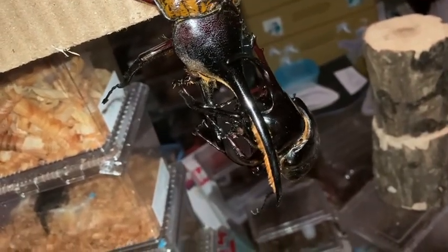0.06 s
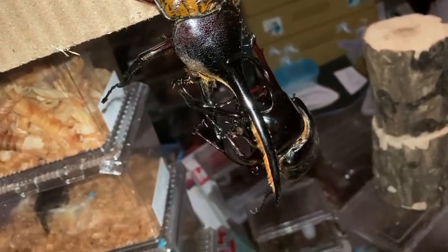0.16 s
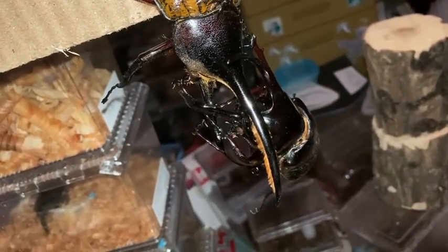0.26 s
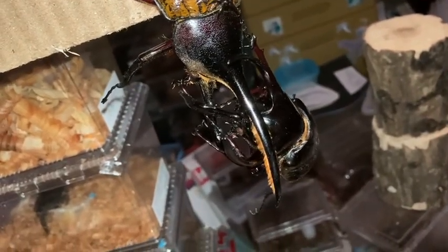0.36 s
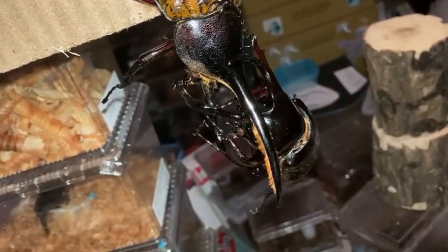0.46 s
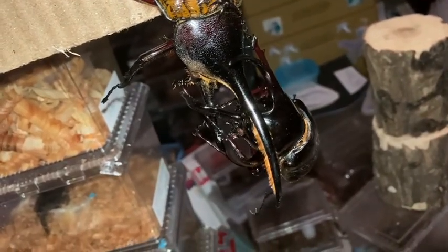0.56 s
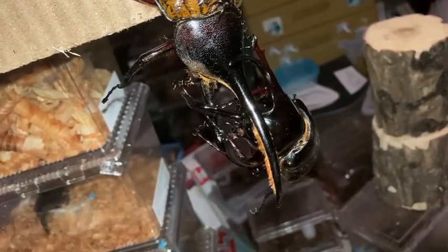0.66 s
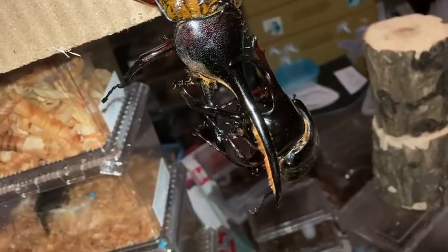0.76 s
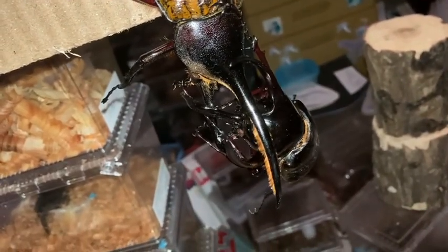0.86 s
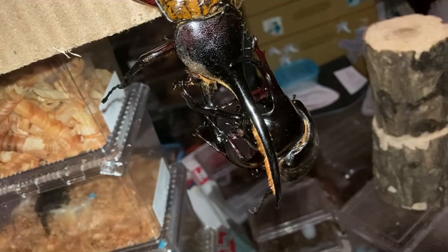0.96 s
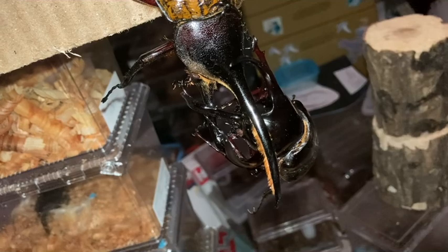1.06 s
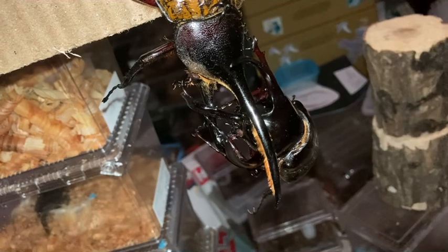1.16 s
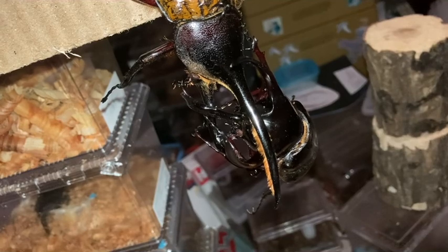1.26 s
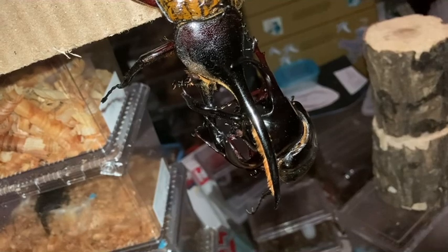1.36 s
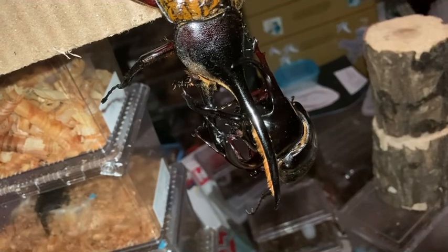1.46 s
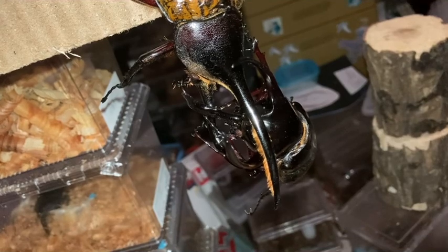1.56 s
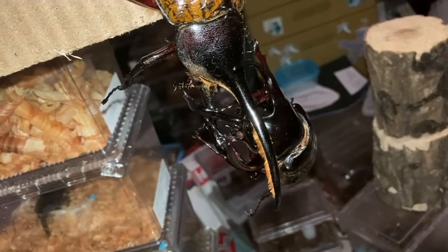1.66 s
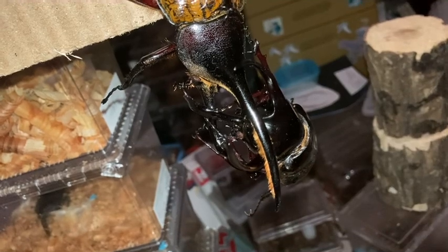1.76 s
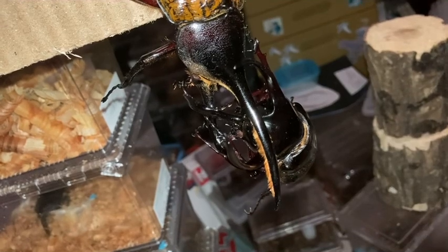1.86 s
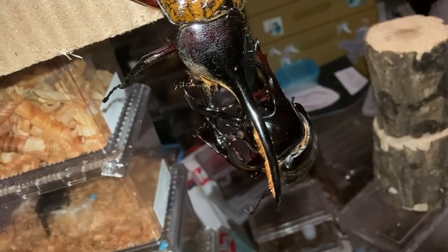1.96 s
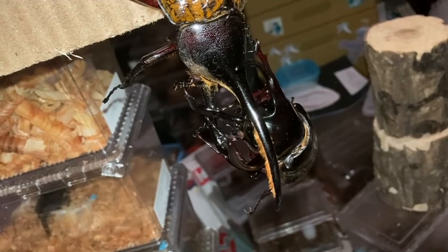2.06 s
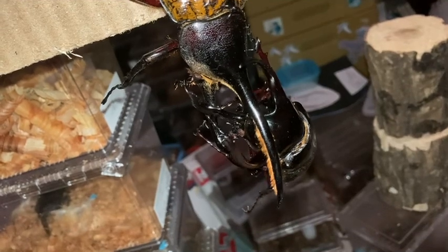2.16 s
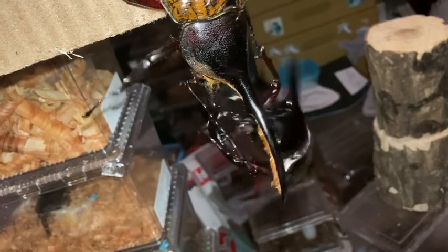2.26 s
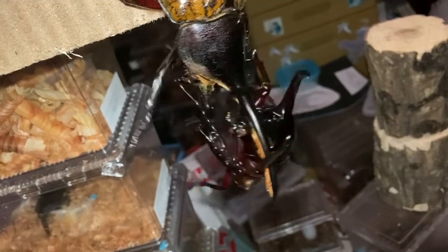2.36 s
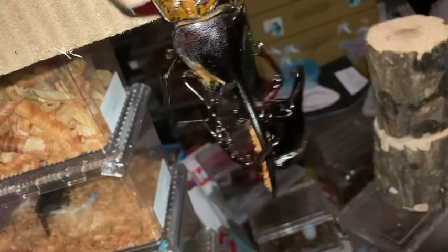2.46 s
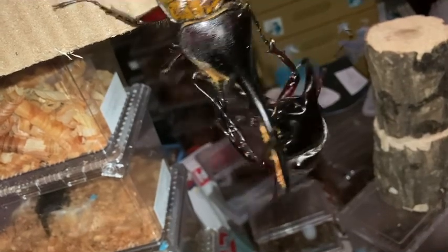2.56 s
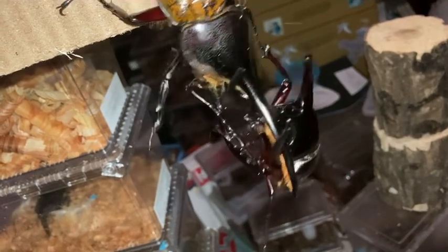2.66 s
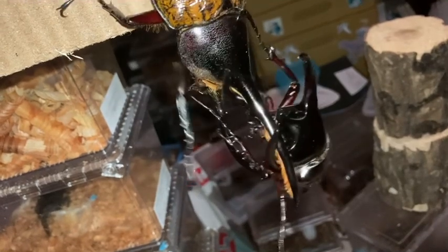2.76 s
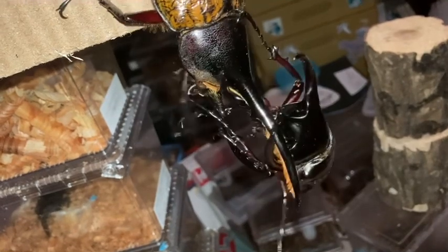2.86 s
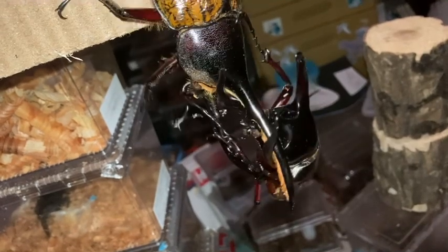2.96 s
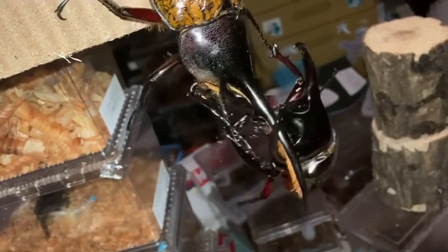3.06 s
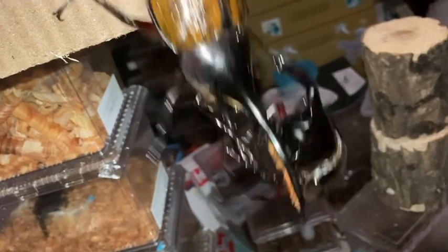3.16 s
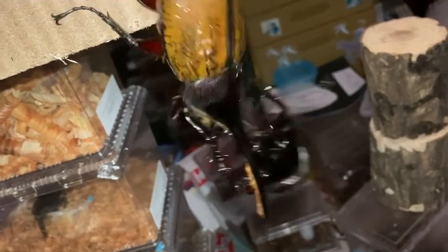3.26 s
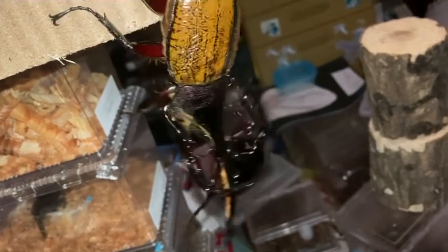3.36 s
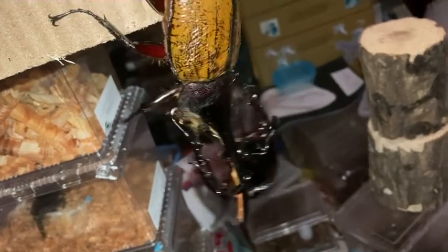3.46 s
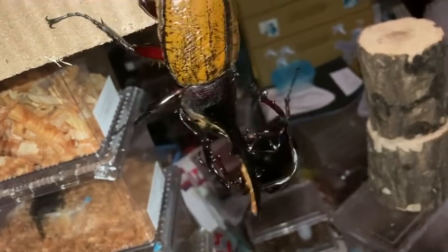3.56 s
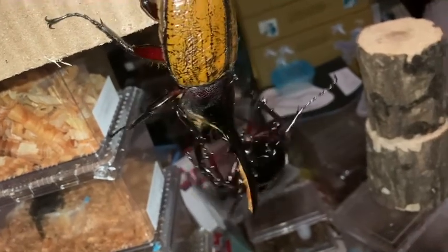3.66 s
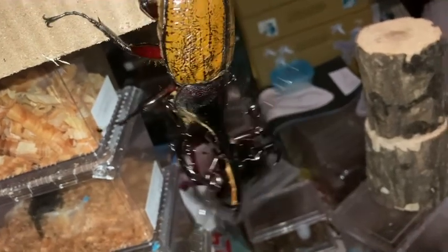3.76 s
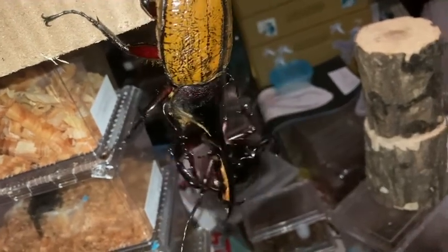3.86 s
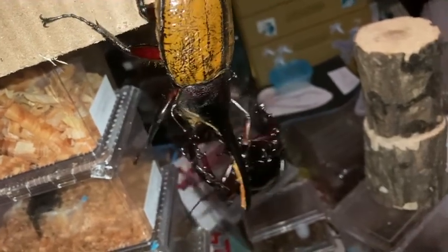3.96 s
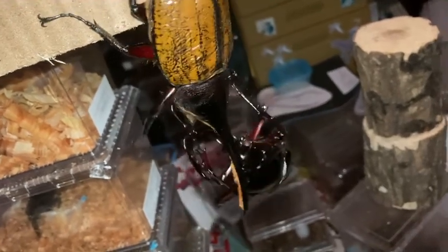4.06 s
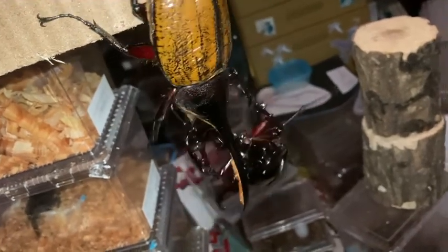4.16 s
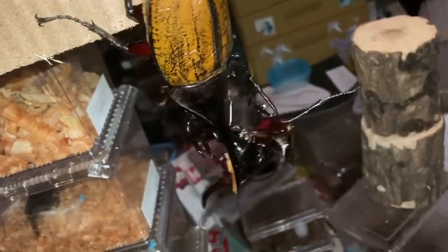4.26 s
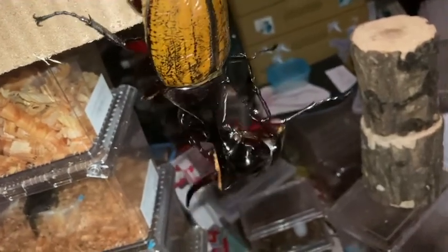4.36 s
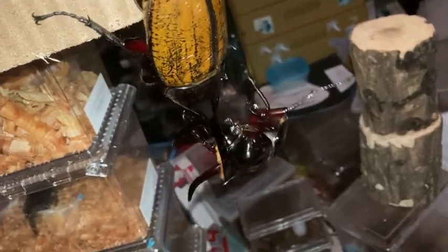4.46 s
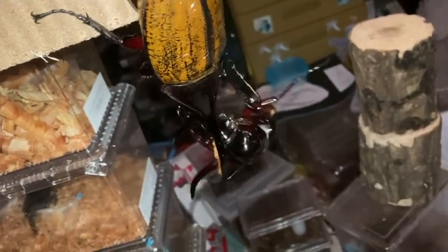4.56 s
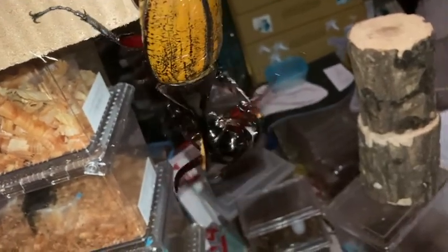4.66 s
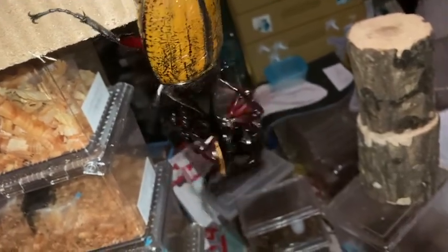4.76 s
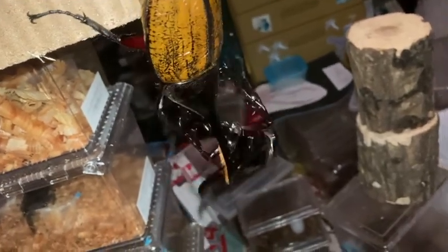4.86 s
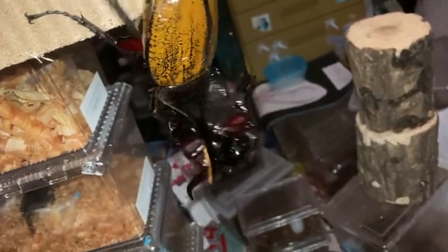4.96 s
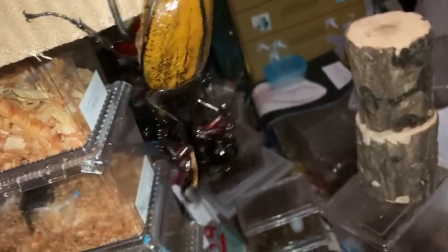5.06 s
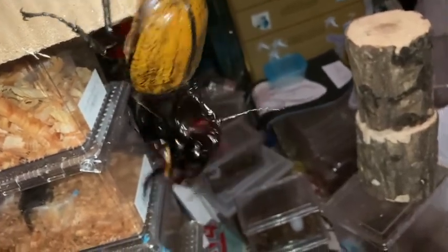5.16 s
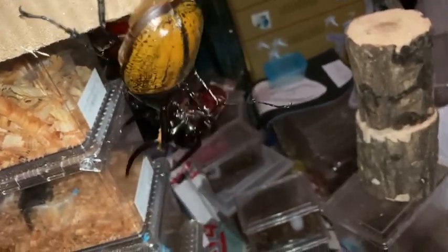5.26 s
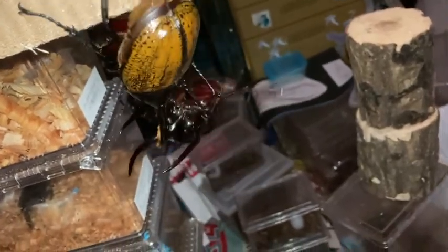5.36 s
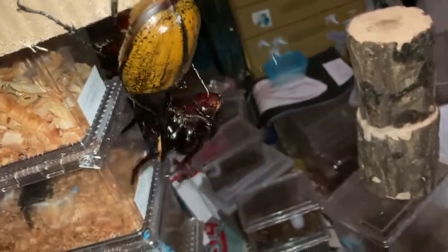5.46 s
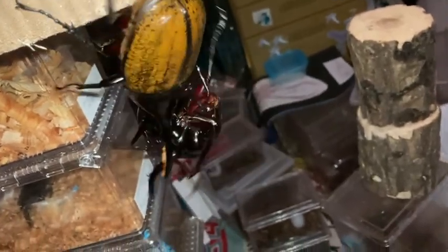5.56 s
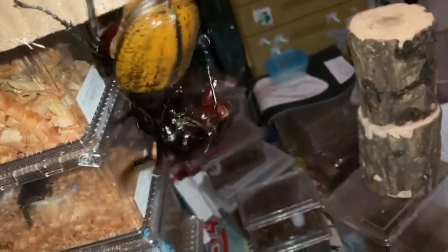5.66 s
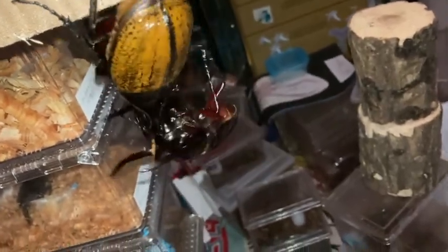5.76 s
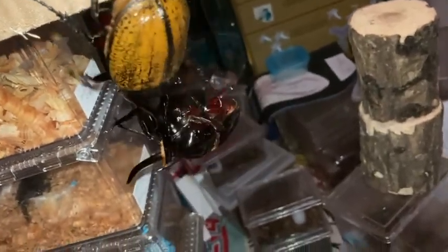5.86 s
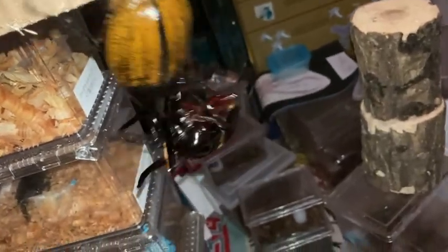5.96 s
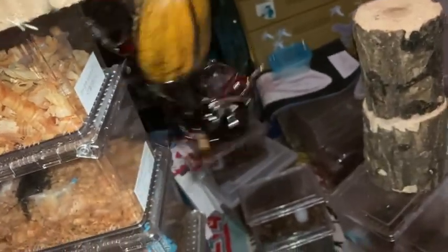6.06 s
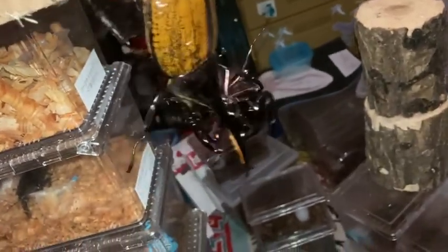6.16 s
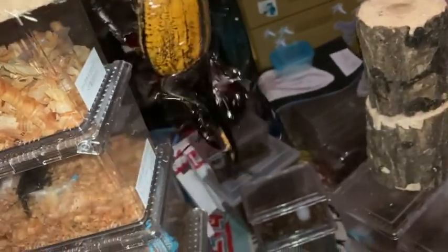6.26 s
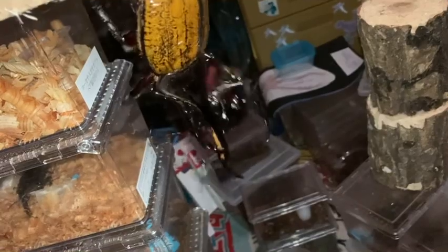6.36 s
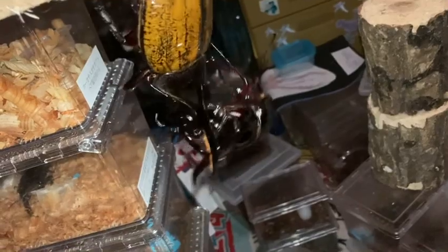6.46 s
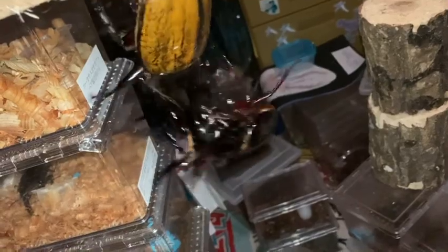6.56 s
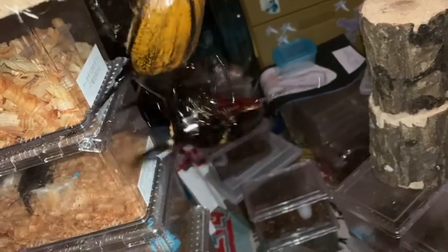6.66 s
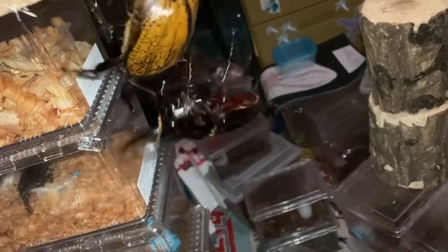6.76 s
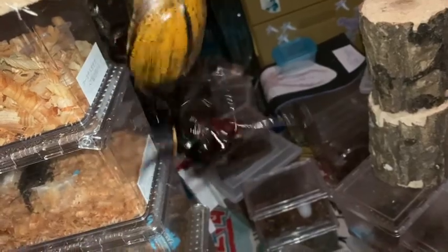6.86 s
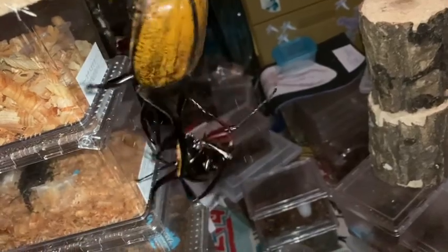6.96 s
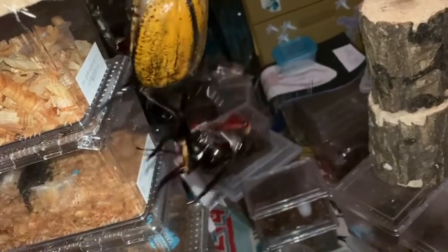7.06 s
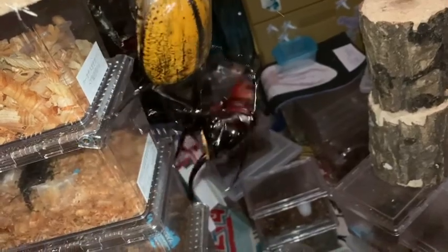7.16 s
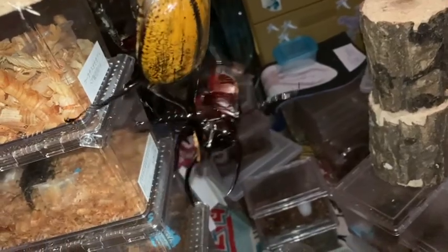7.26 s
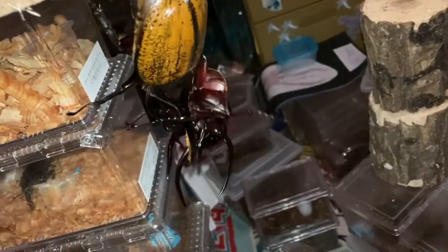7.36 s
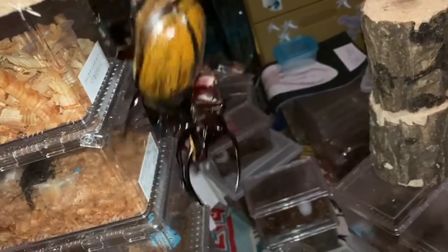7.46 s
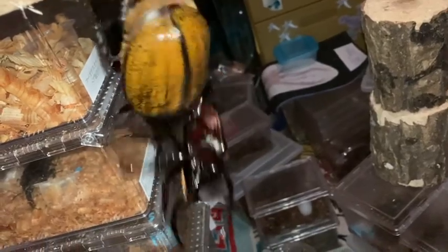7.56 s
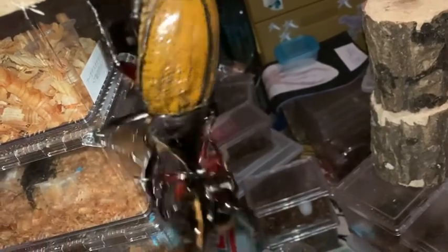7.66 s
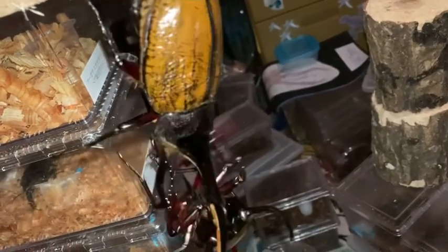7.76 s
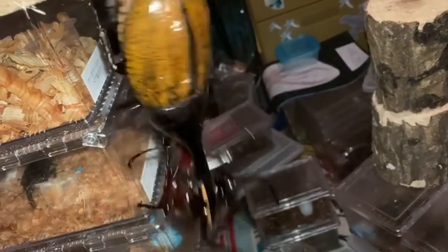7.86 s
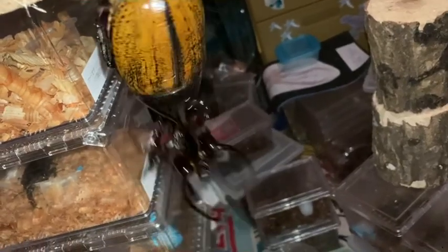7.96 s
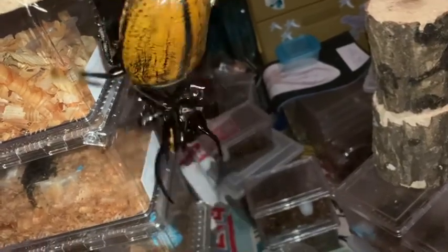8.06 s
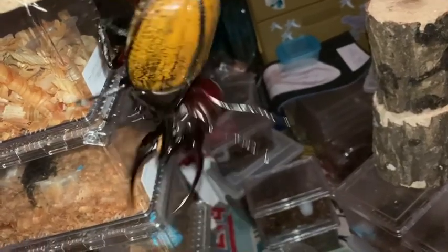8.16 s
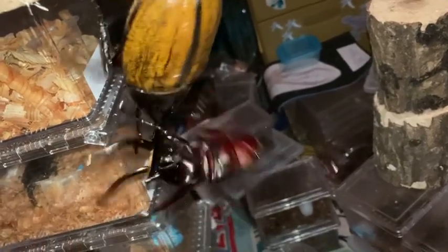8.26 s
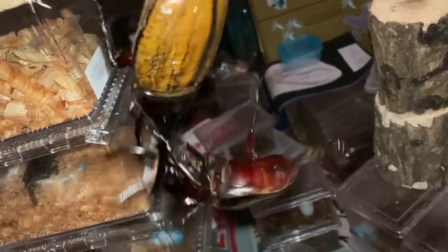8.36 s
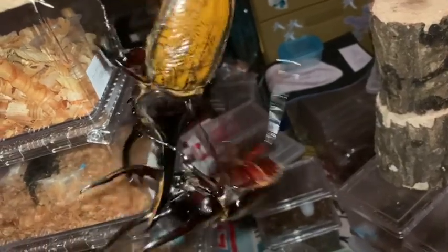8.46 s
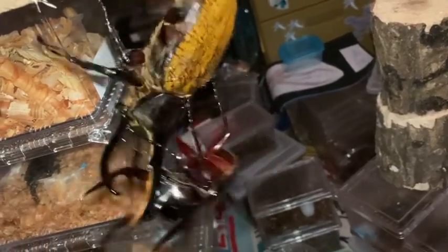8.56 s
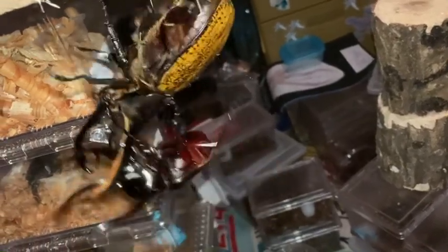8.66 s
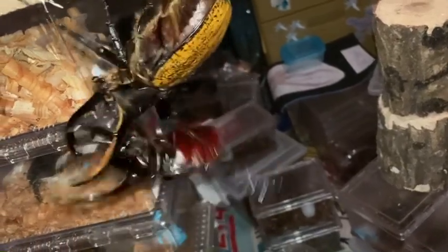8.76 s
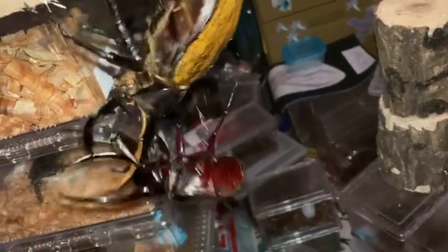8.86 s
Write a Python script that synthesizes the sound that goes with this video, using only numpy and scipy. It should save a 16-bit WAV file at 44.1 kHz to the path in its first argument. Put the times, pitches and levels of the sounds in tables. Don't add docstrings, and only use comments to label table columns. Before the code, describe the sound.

Quiet room hum with soft floor thuds, then irregular dry scratches, sharp claw clicks and hollow shell taps from two wrestling beetles close up.

```python
import sys
import numpy as np
from scipy import signal
from scipy.fft import rfft, irfft, next_fast_len
from scipy.io import wavfile
from scipy.ndimage import uniform_filter1d

SR = 44100
rng = np.random.default_rng(int(sys.argv[2]) if len(sys.argv) > 2 else 0)


def generate_wav(signal):
    frames = np.transpose(np.atleast_2d(signal))
    scaled = np.clip(frames, -1, 1) * 32767
    pcm = np.round(scaled).astype(np.int16)
    wavfile.write(sys.argv[1], SR, pcm)


def how_loud(loudness_db):
    steps = np.asarray(loudness_db, float) / 20
    return 10 ** steps


N = 393372


def unit(x):
    return x / np.sqrt(np.mean(x ** 2))


def along(points, hz):
    f, v = np.transpose(points)
    return np.interp(np.log(hz + 1), np.log(f), v)


def colour(x, gain):
    size = next_fast_len(x.shape[-1])
    hz = np.arange(size // 2 + 1) * SR / size
    return irfft(rfft(x, size) * gain(hz), size)[..., :x.shape[-1]]


def curves(table, off_db=-140):
    s, *columns = np.transpose(table)
    t = np.arange(N) / SR
    switch = np.where((t < s[0]) | (t > s[-1]), how_loud(off_db), 1)
    return [np.interp(t, s, c) for c in columns] + [switch]


def walk(rate_hz):
    hold = int(SR / rate_hz)
    levels = np.repeat(rng.standard_normal(N // hold + 1), hold)
    return unit(uniform_filter1d(levels, hold)[:N])


def add(out, s, y):
    i = int(s * SR)
    out[:, i:i + y.shape[1]] += y[:, :N - i]


def air():
    # pitch_hz, level_db per Hz
    air_spectrum = [(15, -45), (25, -28.5), (70, -3), (161, -9.5), (200, -5.5), (242, -18.5), (277, -13.5),
                    (796, -27.5), (863, -28.5), (1520, -31.5), (1700, -33), (12300, -41.5), (14500, -49),
                    (16000, -63)]
    # pitch_hz, likeness (0 to 1)
    air_alike = [(60, 0.93), (300, 0.57), (600, 0.1), (4000, 0.041)]
    # pitch_hz, level_db
    fan_lines = [(119, -74.5), (200, -69.5)]
    mid, side = rng.standard_normal((2, N))
    tone = lambda hz: how_loud(along(air_spectrum, hz))
    likeness = lambda hz: np.clip(along(air_alike, hz), 0, 1)
    mid = colour(mid, lambda hz: tone(hz) * np.sqrt(1 + likeness(hz)))
    side = colour(side, lambda hz: tone(hz) * np.sqrt(1 - likeness(hz)))
    fan = 0
    for hz, db in fan_lines:
        level = how_loud(db + 2.2 * walk(12)) * np.sqrt(2)
        fan = fan + level * np.sin(2 * np.pi * np.cumsum(hz + .8 * walk(6)) / SR)
    return unit(np.array([mid + side, mid - side])) * how_loud(-62.5 - 6.5) + fan


def thuds():
    # time_s, level_db
    thud_levels = [
        (0.0, -78),
        (0.27, -73),
        (0.37, -48),
        (0.74, -57),
        (1.37, -69),
        (1.74, -57),
        (1.81, -66.5),
        (8.8, -71.5),
        (8.92, -53),
    ]
    # pitch_hz, level_db
    thud_colour = [(20, -35), (33, -22), (60, 6.5), (85, -4), (115, -7), (300, -17.5)]
    db, _ = curves(thud_levels)
    shared, differing = rng.standard_normal((2, N))
    both = shared + 0.24 * differing * np.array([[1], [-1]])
    both = colour(both, lambda hz: how_loud(along([*thud_colour, (600, -60.0)], hz)))
    return unit(both) * how_loud(db - 4.5)


def buzz():
    # time_s, pitch_hz, level_db
    buzz_course = [
        (0.3, 63.2, -81),
        (0.368, 65.8, -52.5),
        (0.68, 63.4, -70),
    ]
    # multiple of the pitch, level_db
    buzz_orders = [(1, -2), (2, -3.5), (3, -7), (4, -39)]
    hz, db, on = curves(buzz_course)
    phase = 2 * np.pi * np.cumsum(hz * (1 + 0.033 * walk(24.1))) / SR
    stack = sum(how_loud(g + 1.4 * walk(12.0)) * np.sin(k * phase) for k, g in buzz_orders)
    return unit(stack) * how_loud(db) * on


def far():
    # pitch_hz, level_db
    far_colour = [(300, -5), (600, -2), (1700, 3), (2600, -5), (4300, -4), (7000, -30)]
    peak_s, half_s, level_db = .42, 0.27, -81
    swell = np.exp(-((np.arange(N) / SR - peak_s) / half_s) ** 2) * how_loud(1.5 * walk(15))
    rustle = colour(rng.standard_normal((2, N)), lambda hz: how_loud(along(far_colour, hz)))
    return unit(rustle) * how_loud(level_db) * swell


def steps():
    # peak_s, pitch_hz, level_db, half_length_s
    loads = [
        (0.797, 60.4, -48.5, 0.052),
        (0.87, 34.8, -60, 0.15),
        (1.56, 55.3, -63, 0.026),
        (1.736, 53.5, -69, 0.036),
        (1.74, 108, -60.5, 0.031),
        (2.452, 294.3, -55.5, 0.011),
        (5.996, 327.6, -43, 0.015),
        (6.777, 382, -49, 0.0093),
    ]
    t = np.arange(N) / SR
    out = np.zeros(N)
    for s, hz, db, half_s in loads:
        swell = np.exp(-((t - s) / half_s) ** 2)
        out += how_loud(db) * np.sqrt(2) * swell * np.sin(2 * np.pi * hz * t)
    return out


def places(count, near_db=-6, near_t60=0.012, own_share=2.2):
    t = np.arange(512) / SR
    near = rng.standard_normal((count, 3, len(t))) * np.exp(-np.log(1000) * t / near_t60)
    near = near[:, :1] + own_share * near[:, 1:]
    near = colour(near, lambda hz: hz / (hz + 500))
    paths = how_loud(near_db) * near / np.sqrt(np.sum(near ** 2, axis=2, keepdims=True))
    paths[np.arange(count), 0, rng.integers(4, 7, size=count)] += 1
    paths[:, 1, 3] += 1
    return paths


def ring(modes, size):
    t = np.arange(size) / SR
    out = np.zeros(size)
    for k, (hz, width, db) in enumerate(modes):
        decay = width * np.exp(-np.pi * width * t)
        out += (-1) ** k * how_loud(db) * decay * np.sin(2 * np.pi * hz * t)
    return out


def spot(modes, chance, spread_db):
    detuned = [(hz * (1 + .045 * c), width, db + spread_db * c)
               for (hz, width, db), c in zip(modes, chance)]
    return ring(detuned, size=2048)


def crack(size=128):
    # pitch_hz, level_db
    crack_colour = [(4500, -31), (5600, -4), (7000, -1), (11500, -2), (13000, -8.5), (15500, -10.5),
                    (16700, -20)]
    hz = np.arange(size + 1) * SR / (2 * size)
    cepstrum = irfft(np.log(how_loud(along([*crack_colour, (18000, -67.0)], hz))))
    cepstrum[1:size] *= 2
    cepstrum[size + 1:] = 0
    response = irfft(np.exp(rfft(cepstrum)))[:size]
    return signal.sosfilt(signal.butter(2, 5000, "high", fs=SR, output="sos"), response)


def slips(shape, scatter_db, share):
    size = how_loud(scatter_db * np.minimum(rng.exponential(size=shape), 4.5))
    return size * rng.standard_normal(shape) * (rng.random(shape) < share)


def strike(push, chance, place, board_db, top_db, own_hz=2000, own_db=0):
    # pitch_hz, width_hz, level_db
    board_modes = [(251, 148, -3.5), (336, 122, -2), (618.3, 36, 2.5), (685, 77, -4), (866, 60, 3)]
    # pitch_hz, width_hz, level_db
    shell_modes = [(1365, 380, -7.5), (1530, 182, 0.5), (2250, 150, 1), (2880, 2080, -9), (3950, 612, 2),
                   (4230, 1470, -3), (5230, 1230, -8.5)]
    near_octaves = 0.2
    shell = []
    for hz, width, db in shell_modes:
        nearness = np.exp(-(np.log2(hz / own_hz) / near_octaves) ** 2)
        shell.append((hz, width, db + own_db * nearness))
    bodies = np.array([spot(board_modes, chance, 2.02),
                       spot(shell, chance[len(board_modes):], 2.0),
                       np.pad(crack(), (0, 2048 - 128))])
    bodies = signal.sosfilt(signal.butter(2, 170, "high", fs=SR, output="sos"), bodies)
    parts = signal.oaconvolve(push * np.ones((3, 1)), bodies, axes=1)
    power = uniform_filter1d(parts ** 2, size=64, axis=1).max(axis=1)
    shell_share = np.sqrt(np.clip(1 - how_loud(2 * top_db), .012, 1))
    shares = np.array([how_loud(board_db), shell_share, how_loud(top_db + 3.0)])
    sound = (shares / np.sqrt(power)) @ parts
    heard = signal.fftconvolve(sound[None], place, axes=1)
    return heard / np.sqrt(uniform_filter1d(np.mean(heard ** 2, axis=0), size=64).max())


def ticks(table, db_offset):
    out, t = np.zeros((2, N)), np.arange(1024) / SR
    spray = slips((len(table), len(t)), 0.52, .4)
    chances = rng.standard_normal((len(table), 12))
    from_peak = np.abs(t - .001)
    fade = np.exp(-from_peak / 0.00033) + 0.055 * np.exp(-from_peak / 0.0095)
    for row, grains, chance, place in zip(table, spray, chances, places(len(table))):
        s, db, board_db, top_db, hz = row
        push = unit(grains) * fade
        heard = strike(push, chance, place, board_db - 17.0, top_db, own_hz=hz, own_db=11.0)
        add(out, s - .001, how_loud(db + db_offset) * heard)
    return out


OFF_BOARD_DB, ON_BOARD_DB = -33, 4.5


def touches():
    # start_s, level_db, ring_hz
    light = [
        (1.6836, -67, 3990),
        (1.7918, -72, 1400),
        (1.873, -66, 1610),
        (3.659, -43.5, 2300),
        (3.7208, -39, 3770),
        (3.7928, -52, 1810),
        (3.8715, -41, 1420),
        (7.2, -51, 4300),
    ]
    return ticks([(s, db, OFF_BOARD_DB, -7, hz) for s, db, hz in light], -4.0)


def drags():
    # share of the length
    # spent swelling, treble_share_db. strokes swell and fade evenly
    strokes, stroke = [(2.154, 28, -65.5, -7, 1500), (2.438, 25, -43, -1, 2230),
                       (2.953, 23, -51, -6.5, 1500), (3.204, 68, -35, -11.5, 1570),
                       (3.879, 28, -45, 11, 1330), (3.966, 39.0, -48, 2, 4460),
                       (4.127, 31, -54.5, -16, 1580), (4.416, 20, -46, -29, 3700),
                       (4.554, 34, -52.5, -4.5, 1640), (4.814, 49, -50.5, -3, 2140),
                       (5.091, 38, -38.5, -5.5, 3600), (5.203, 130, -46.5, -12, 2400),
                       (5.352, 24, -47.0, -3, 2830), (5.456, 36, -41.5, -3.5, 3800),
                       (5.74, 26, -43.5, -0.5, 2380), (6.025, 25, -40, -6.5, 3760),
                       (6.811, 24, -40.5, -9.5, 4870), (7.497, 45, -46.5, -4, 3780),
                       (7.678, 19, -50, -1.5, 4050), (8.102, 10.4, -51.5, 2, 1460),
                       (8.541, 21.5, -45.5, -9.5, 1630), (4.064, 10, -54, -14, 3500)], (0.52, -3)
    slides, slide = [(2.25, 149, -52, -6.5, 1530), (3.03, 37, -57, 3, 1500), (4.35, 31.2, -38, -3, 1510),
                     (4.674, 208, -62.5, -9, 1710), (5.244, 65.5, -45, -6.5, 4300),
                     (6.56, 34.2, -59, -1, 3580), (7.07, 293, -61, -28, 1540), (8.143, 55, -46, 0, 3750),
                     (8.328, 35.3, -42.5, -6.5, 4160), (8.484, 85, -58, -20, 2330)], (0.15, -3.5)
    rubs, rub = [(2.302, 38.0, -78, -44, 1600), (2.832, 49, -52.5, 1, 1530), (3.288, 66, -43, -7.5, 3660),
                 (3.483, 51, -44, -8, 2200), (3.59, 34, -43.5, 4.5, 4400), (4.215, 96, -59, -32, 1600),
                 (4.258, 52, -57.5, 0, 4000), (6.108, 30, -41.5, 0.5, 2310), (6.4, 35, -43, -1.0, 3830),
                 (7.46, 41, -43, -1, 1530), (7.574, 23.2, -39.5, -3.5, 4600), (8.384, 13, -39, -11.5, 1480),
                 (8.892, 23, -47.5, -7, 2280)], (0.45, -8.5)
    jerks, jerk = [(2.466, 23, -45, -11, 2340), (4.039, 40, -50, -7, 4300), (4.889, 15.5, -34, -26, 3960),
                   (5.687, 43, -43, -13, 1640), (5.82, 46, -42, -3.5, 1500), (6.168, 27, -47, 4, 2170),
                   (6.243, 74, -46.5, -11.5, 4300), (6.711, 126, -49, -12.5, 3700),
                   (6.881, 26, -38.5, -2, 1640), (7.348, 12, -64.5, -23, 2320), (7.722, 47, -48, -2, 2430),
                   (8.199, 65, -41.5, -17, 1460)], (0.38, -2.5)
    swishes, swish = [(2.502, 27.7, -34, -23, 1500), (2.537, 13, -45, -25, 1900),
                      (7.634, 51, -54, -8, 3100), (7.895, 35, -44.5, -10, 3900), (7.931, 61, -54, -8, 5400),
                      (8.703, 24, -68.5, -18, 3730), (5.855, 13, -51, -12, 4500),
                      (3.507, 11, -49, -6, 4000)], (0.58, -0.92)
    pulls, pull = [(2.617, 24, -51.5, -30, 1570), (3.739, 48, -51, 7, 3780), (4.477, 46, -49.5, -0.5, 3740),
                   (5.062, 70, -41.5, -13, 1770), (5.562, 40, -48.5, -12, 1530), (5.63, 76, -50.5, 0, 3960),
                   (5.989, 50.3, -39, -10, 1630), (7.018, 50.5, -51.5, -3, 1520),
                   (8.443, 52.6, -53, 7, 4000), (8.853, 36.6, -41.5, -11, 1360)], (0.75, -2.95)
    shoves, shove = [(2.69, 32, -44, -7, 1590), (2.878, 53, -53, -4.5, 1600), (3.434, 36, -47, -16, 1530),
                     (4.075, 18, -57.5, -5, 1560)], (0.38, -6.5)
    scuffs, scuff = [(3.377, 43, -54, -2, 4400), (3.665, 5.8, -51, 27, 1380), (3.834, 12, -55, -14, 1690),
                     (4.74, 14, -54, -3.5, 1470), (6.765, 16, -45.5, 0.5, 1610),
                     (8.251, 34, -48.5, 9, 1570)], (0.45, -25)
    kinds = [(strokes, stroke), (slides, slide), (rubs, rub), (jerks, jerk),
             (swishes, swish), (pulls, pull), (shoves, shove), (scuffs, scuff)]
    usual_db = np.mean([row[2] for table, _ in kinds for row in table])
    rows = []
    for table, (rise, treble_db) in kinds:
        for s, ms, db, board_db, hz in table:
            top_db = treble_db + 0.0567 * (db - usual_db)
            rows.append((s, rise * ms, (1 - rise) * ms, db, board_db, top_db, hz))
    return rows


def scrapes(table):
    out, chances = np.zeros((2, N)), rng.standard_normal((len(table), 12))
    own_grip = np.array([walk(70), walk(90), walk(120)])
    grip_db = 2.37 * walk(110) + 1.03 * walk(300) + 2.55 * own_grip
    rubbing = slips((3, N), 2.1, .15) * how_loud(grip_db)
    rubbing = rubbing + how_loud(8.5) * slips(N, 1.9, .009)
    for row, chance, place in zip(table, chances, places(len(table))):
        s, rise_ms, fall_ms, db, board_db, top_db, hz = row
        ms = np.arange(-3 * rise_ms, 4 * fall_ms, 1000 / SR)
        half_ms = np.where(ms < 0, rise_ms, fall_ms)
        swell = .5 ** (np.abs(ms / half_ms) ** np.where(ms < 0, 1.7, 1.3))
        i = int((s + ms[0] / 1000) * SR)
        push = rubbing[:, i:i + len(ms)] * swell[:N - i]
        heard = strike(push, chance, place, board_db - 3.5, top_db, own_hz=hz, own_db=5.5)
        add(out, i / SR, how_loud(db + 2.5) * heard)
    return out


def drag(count=3):
    # time_s, level_db
    rustle_levels = [(2.19, -100), (2.23, -71), (2.4, -60.5), (3.4, -59.5), (4.6, -63), (5.47, -60.5),
                     (6.3, -58.5), (6.55, -71.5), (7.3, -70), (7.6, -78), (8.0, -67.5), (8.3, -63),
                     (8.65, -82), (8.86, -63), (8.92, -47.5)]
    db, on = curves(rustle_levels)
    legs = np.zeros(1)
    for place in places(count):
        push = slips(N, 3.0, 0.088) * how_loud(1.8 * walk(40) + 4.6 * walk(9))
        legs = legs + strike(push, rng.standard_normal(12), place, -12, -4.5)
    return unit(legs[:, :N]) * how_loud(db - 3.0) * on


def contacts():
    # start_s, level_db, treble_share_db, ring_hz
    knocks = [(2.222, -53.5, -4, 1460), (2.4324, -29.5, -3.5, 2500), (3.8293, -37.5, 4, 4270),
              (4.373, -34, -19, 1620), (4.86, -40.5, -2.5, 4460), (4.898, -30, -27, 1530),
              (5.2652, -36, -1.5, 2970), (5.4263, -35, -2.5, 4500), (5.9697, -30, -1.5, 1650),
              (5.9802, -27.5, -7, 1690), (5.9998, -28, -2, 4370), (6.022, -25, -6, 3860),
              (6.553, -39.5, -1.5, 3760), (6.8789, -29.5, -3, 1670), (7.7416, -33.5, -0.6, 3800),
              (7.9256, -33.5, 7, 3600), (8.3802, -35.5, -4, 2210), (8.8638, -38, -1.3, 1260)]
    # start_s, level_db, treble_share_db,
    # ring_hz
    shell_taps = [(2.2966, -54, -12, 2330), (2.9438, -43.5, -22, 2300), (3.367, -42, -15, 3650),
                  (3.473, -36, -7, 3970), (3.575, -43, -17, 1620), (3.5888, -38, -19, 4150),
                  (4.071, -63, -15, 1560), (4.2065, -51.5, -15, 1580), (4.485, -40, -8, 2460),
                  (4.6926, -49.5, -12, 4230), (4.7026, -51, -1.5, 1650), (4.9614, -52, 0, 4050),
                  (5.0843, -33, -17, 1530), (5.1687, -47, -7, 2380), (5.2334, -39, -15, 2530),
                  (6.1685, -40, -7, 2200), (7.0098, -45.5, -3.5, 1500), (7.3521, -49, -11, 2370),
                  (7.5519, -45, -12, 2340), (8.2596, -40.5, -8, 1580), (8.274, -43, -20, 1530),
                  (8.5465, -46, -14, 1700),
                  (2.674, -35, -15, 1530), (2.826, -38.5, -25, 1570), (3.0766, -46, -23, 2140),
            (3.148, -37.5, -12, 1630), (3.4899, -36, -10, 2140), (3.7435, -39, -8, 1580),
            (5.059, -32.5, -33, 1890), (5.2118, -40, -7, 3070), (5.2257, -46, -6, 4300),
            (5.7405, -27, -10, 2410), (6.113, -23, -18, 1965), (6.3956, -40.5, -12, 3650),
            (6.762, -27.5, -12, 1690), (7.4326, -35.5, -46, 1450), (7.454, -31.5, -9.5, 1620),
            (7.499, -35.5, -28, 3980), (7.5648, -33.5, -29, 4400), (8.1332, -33.5, -15, 3540),
            (8.1951, -35.5, -20, 1440), (8.3193, -34.5, -26, 1430), (8.3363, -34, -21, 4140),
            (8.438, -41.5, -23, 2250)]
    # start_s, level_db, ring_hz
    flicks = [(2.3812, -50, 5330), (2.7599, -56, 4280), (3.0146, -64, 3830), (3.1383, -45.5, 2320),
              (3.7065, -48, 3850), (3.7837, -56, 5590), (3.806, -53, 4270), (3.8612, -42, 2620),
              (3.9716, -38, 4270), (4.0468, -45, 2250), (4.2187, -45, 1760), (4.4313, -49, 1400),
              (4.7756, -44, 1650), (5.3572, -47, 2460), (5.3935, -52, 4300), (5.4366, -38, 4120),
              (5.6091, -47, 3540), (5.693, -36, 1560), (5.8468, -43, 4220), (5.8993, -43, 3680),
              (6.0641, -45, 5260), (6.1798, -44, 3590), (6.4733, -59, 3550), (6.7022, -45.5, 1750),
              (7.3062, -54, 4980), (7.7204, -41, 2330), (7.7781, -46.5, 5260), (7.8412, -47, 4150),
              (7.8641, -47, 3950), (7.8774, -48, 4070), (8.0188, -58, 5590), (8.3091, -46, 1710),
              (8.4782, -49, 3410), (8.6013, -52.5, 5590)]
    # start_s, level_db
    snaps = [(2.4976, -46), (4.2578, -35.5), (4.365, -27), (5.568, -35.5), (5.6377, -32.5), (5.679, -24.5),
             (6.093, -29), (6.3788, -33), (6.7825, -36.5), (6.8087, -32.5), (6.8484, -30.5), (7.1418, -39),
             (7.538, -46), (7.9338, -30), (8.063, -46), (8.492, -43.5), (8.7738, -28), (8.828, -39),
             (8.8575, -33.5)]
    # start_s, level_db, ring_hz
    claw_ticks = [(2.958, -46, 1760), (3.023, -44.5, 1530), (3.3764, -25, 4670), (4.3434, -29, 1560),
                  (4.465, -35, 4400), (4.6718, -41.5, 4820), (4.733, -46, 1590), (4.8116, -30.5, 2250),
                  (4.8877, -25.5, 4300), (5.0875, -24, 3620), (5.241, -30.5, 4700), (5.2518, -32, 2720),
                  (5.348, -42, 1770), (5.459, -43, 3770), (5.7447, -27.5, 2360), (6.16, -40, 2190),
                  (6.2395, -32, 4500), (6.25, -34.5, 1530), (6.366, -42.5, 3770), (6.976, -43, 4900),
                  (7.9048, -34.5, 3860), (8.097, -30, 4530), (8.798, -38, 4600)]
    return ([(s, db, ON_BOARD_DB, top_db, hz) for s, db, top_db, hz in knocks]
            + [(s, db, OFF_BOARD_DB, top_db, hz) for s, db, top_db, hz in shell_taps]
            + [(s, db, OFF_BOARD_DB, -1, hz) for s, db, hz in flicks]
            + [(s, db, OFF_BOARD_DB, -0.27, 3830) for s, db in snaps]
            + [(s, db, OFF_BOARD_DB, -4.5, hz) for s, db, hz in claw_ticks])


def walls(x, room_db=-19, room_t60=0.28):
    t = np.arange(SR // 3) / SR
    tail = rng.standard_normal((2, len(t))) * np.exp(-np.log(1000) * t / room_t60)
    tail = unit(colour(tail, lambda hz: 1 / (1 + hz / 3500))) / np.sqrt(len(t))
    return x + how_loud(room_db) * signal.fftconvolve(x, tail, axes=1)[:, :N]


def scene():
    pan_db, lag_s = 1.6, -.0004
    left, right = buzz() + thuds() + steps()
    left = np.roll(left, int(lag_s * SR)) * how_loud(pan_db / 2)
    floor = np.array([left, right * how_loud(-pan_db / 2)])
    beetles = touches() + scrapes(drags()) + drag() + ticks(contacts(), 0.083)
    return air() + floor + far() + walls(beetles)


def spread(dry):
    split_hz, lag_s, top_hz = 6500, .000304, 16750
    leak = 0.45
    shared = lambda hz: (1 - leak ** 2) / (1 + (split_hz / (hz + 1)) ** 12)
    left_top = colour(dry[0], lambda hz: -np.sqrt(shared(hz)) * np.exp(-2j * np.pi * hz * lag_s))
    right = colour(dry[1], lambda hz: np.sqrt(1 - shared(hz))) + left_top
    return colour(np.array([dry[0], right]), lambda hz: hz < top_hz)


def thin_out(both):
    # low_hz, high_hz
    low_hz, high_hz = (4800, 15600)
    weak_db, sharp = -8, 9
    pair = np.array([both[0] + both[1], both[0] - both[1]]) / 2
    hz, _, z = signal.stft(pair, SR, nperseg=2048)
    bands = (np.abs(z[:, :1024]) ** 2).reshape(2, 64, 16, -1).sum(axis=2)
    bands = uniform_filter1d(bands, size=2, axis=1, origin=-1)
    keep = np.repeat(bands > how_loud(2 * weak_db) * bands[::-1], 16, axis=1)
    bin_hz = hz[:1024, None]
    keep = (keep | (bin_hz < low_hz)) & (bin_hz < high_hz)
    frames = np.abs(irfft(z[0] * (hz[:, None] > low_hz), axis=0))
    click = frames.max(axis=0) > sharp * np.sqrt(np.mean(frames ** 2, axis=0))
    z[:, :1024] *= keep | click
    mid, side = signal.istft(z, SR, nperseg=2048)[1][:, :N]
    return np.array([mid + side, mid - side])


def top_cut(x):
    return signal.sosfilt(signal.butter(12, 16820, fs=SR, output="sos"), x)


def record(dry):
    mix = thin_out(spread(dry))
    return top_cut(mix)


dry = scene()
out = record(dry)
generate_wav(out)
```